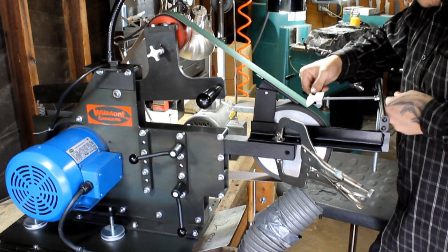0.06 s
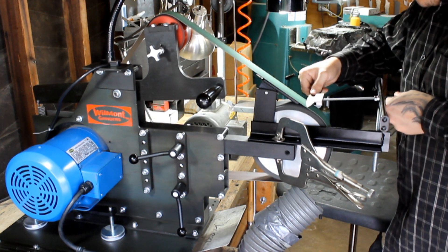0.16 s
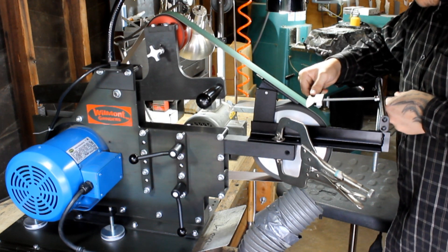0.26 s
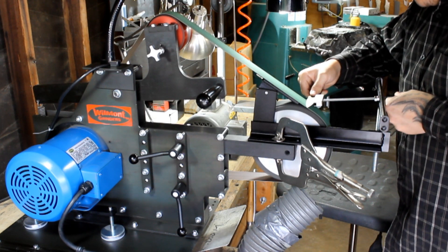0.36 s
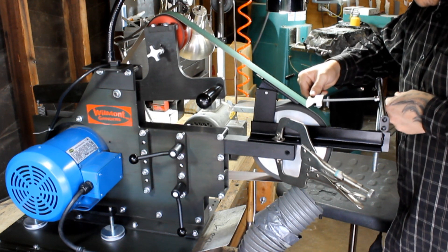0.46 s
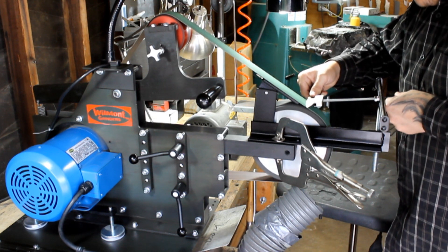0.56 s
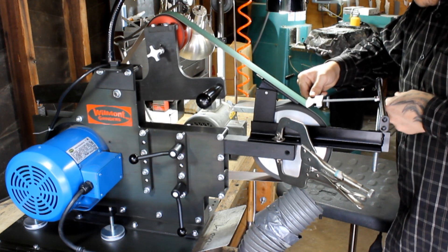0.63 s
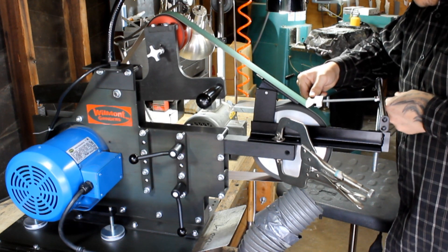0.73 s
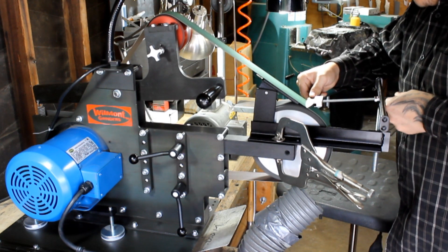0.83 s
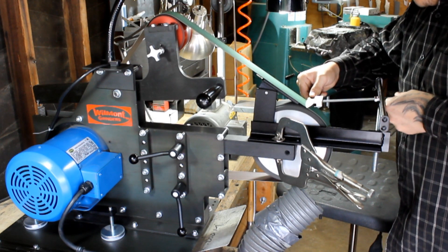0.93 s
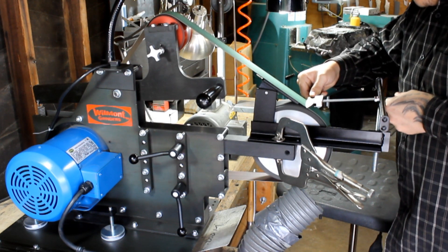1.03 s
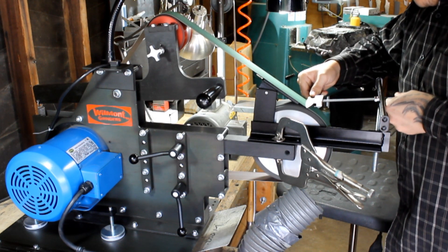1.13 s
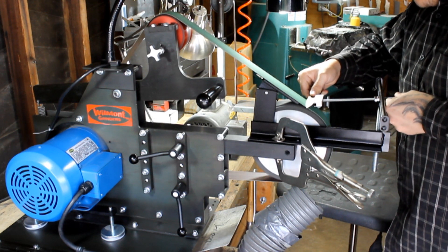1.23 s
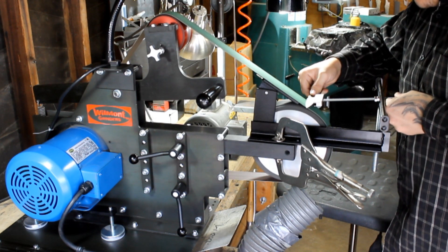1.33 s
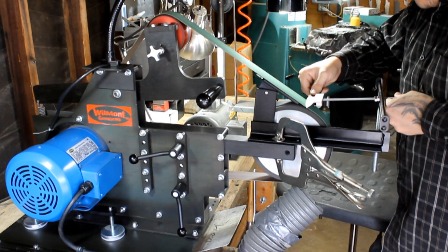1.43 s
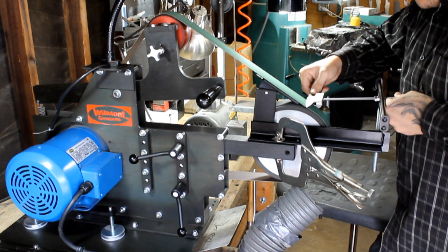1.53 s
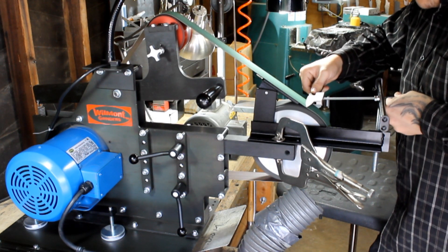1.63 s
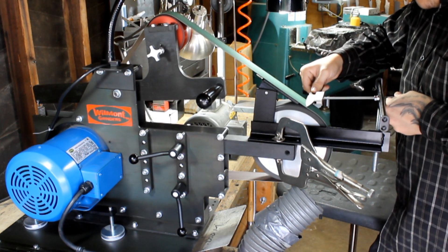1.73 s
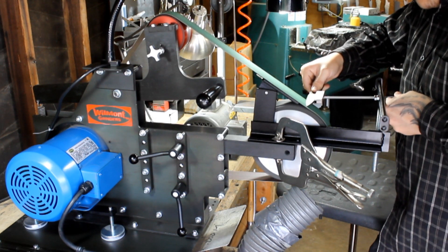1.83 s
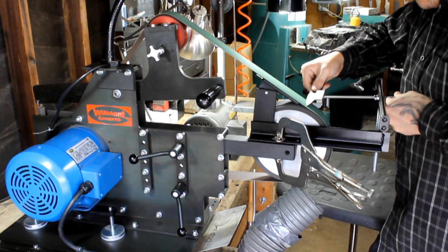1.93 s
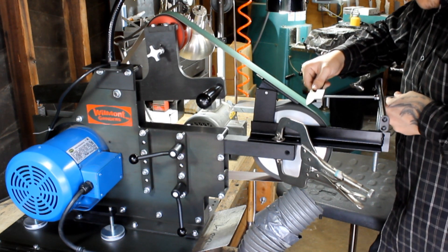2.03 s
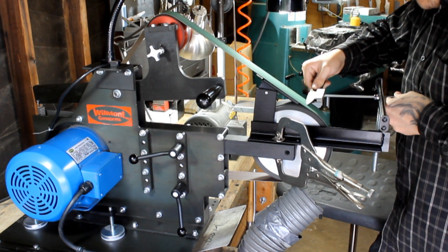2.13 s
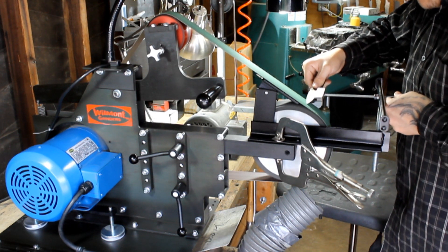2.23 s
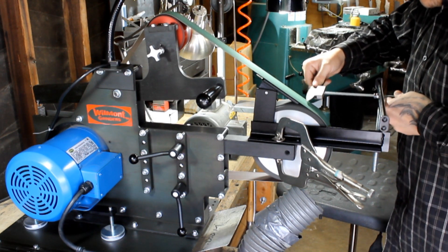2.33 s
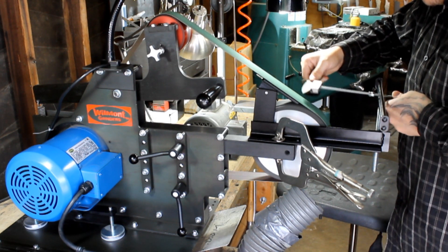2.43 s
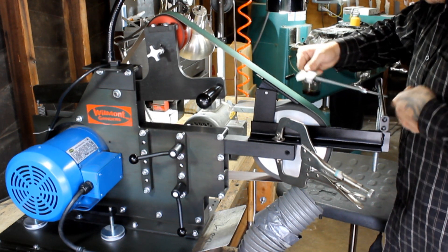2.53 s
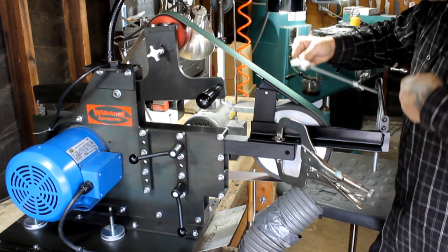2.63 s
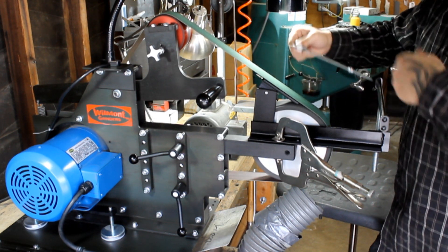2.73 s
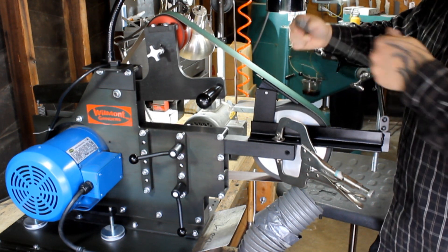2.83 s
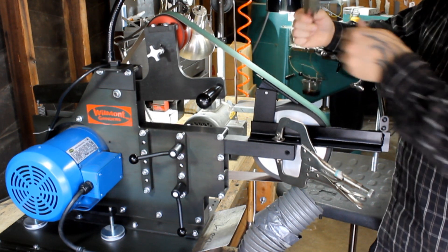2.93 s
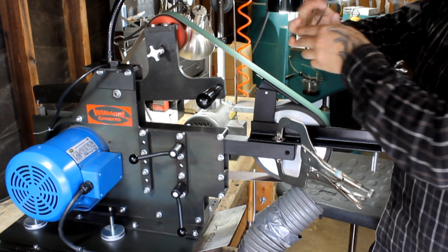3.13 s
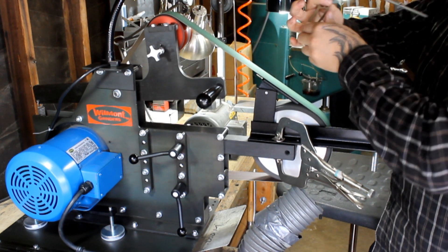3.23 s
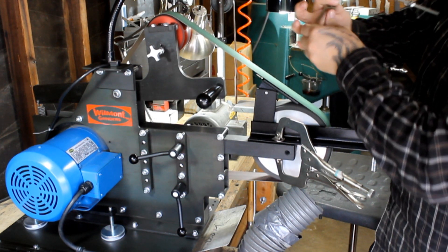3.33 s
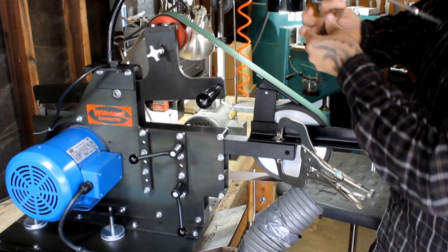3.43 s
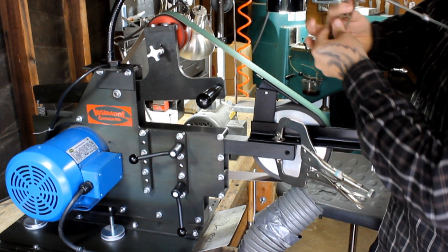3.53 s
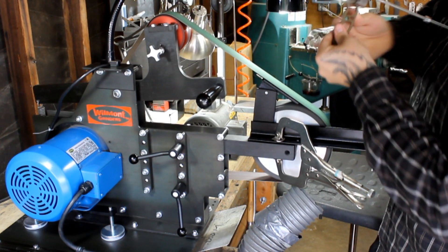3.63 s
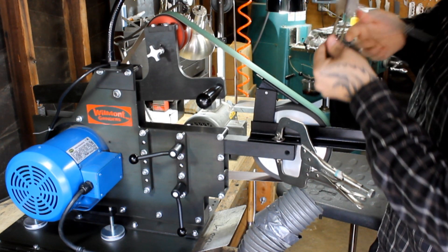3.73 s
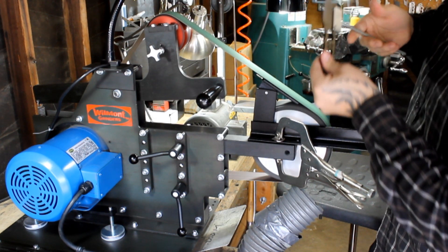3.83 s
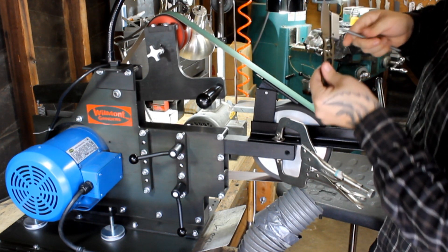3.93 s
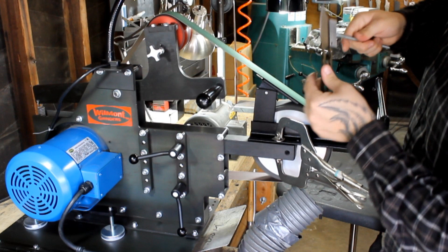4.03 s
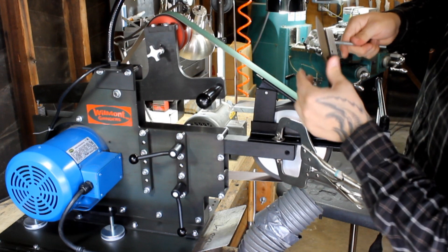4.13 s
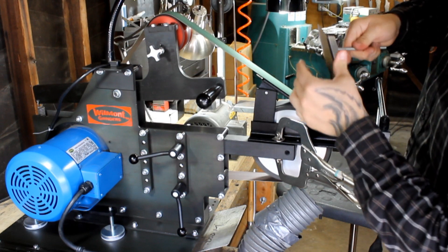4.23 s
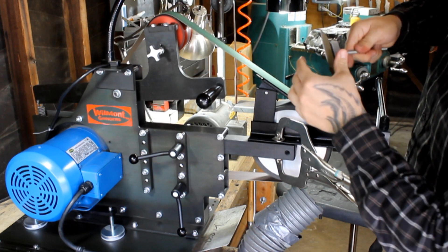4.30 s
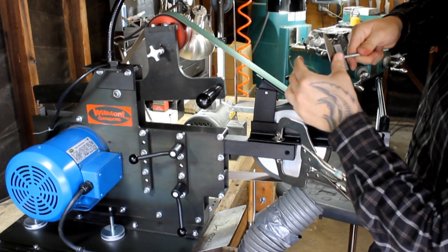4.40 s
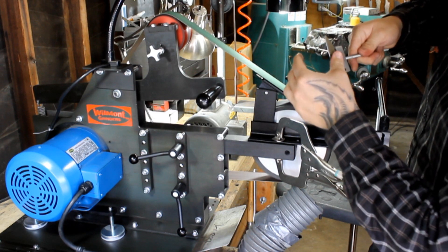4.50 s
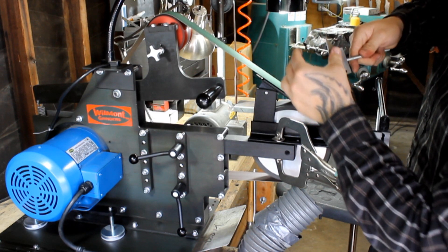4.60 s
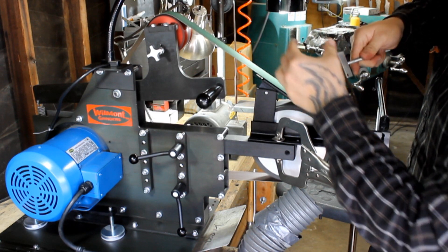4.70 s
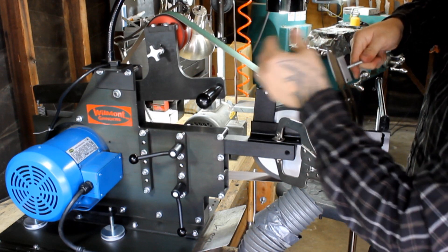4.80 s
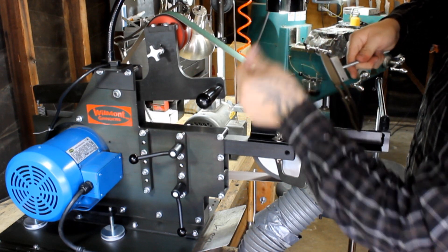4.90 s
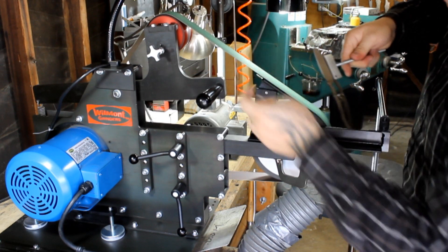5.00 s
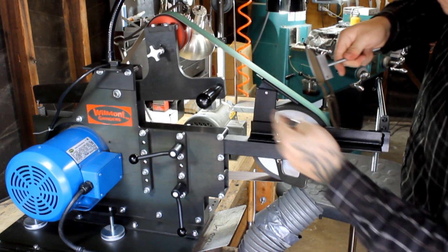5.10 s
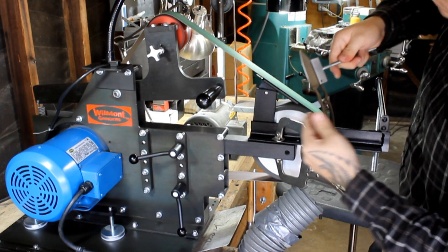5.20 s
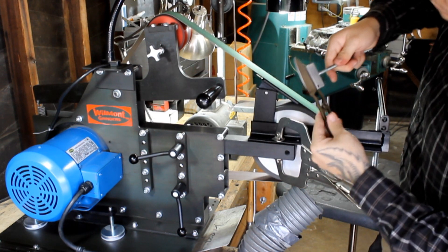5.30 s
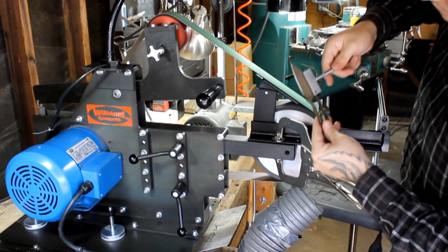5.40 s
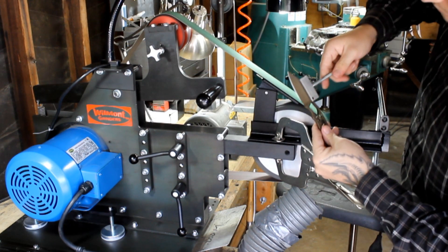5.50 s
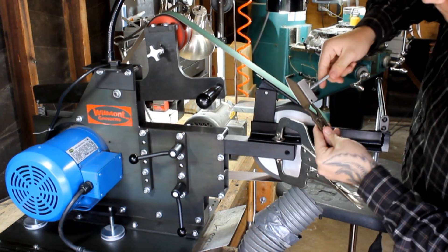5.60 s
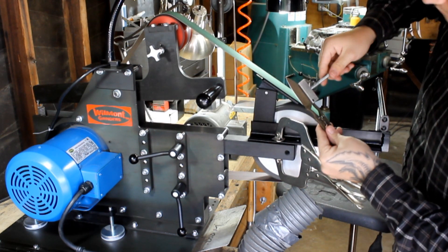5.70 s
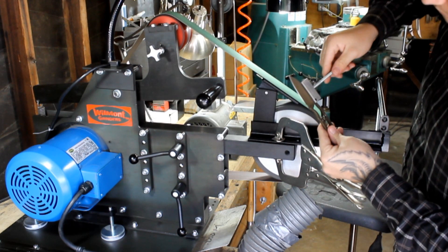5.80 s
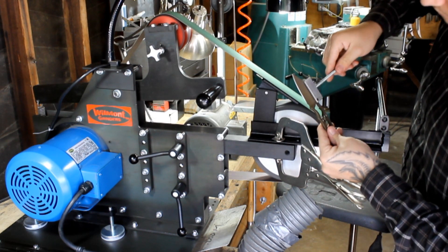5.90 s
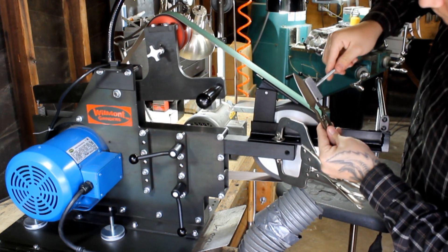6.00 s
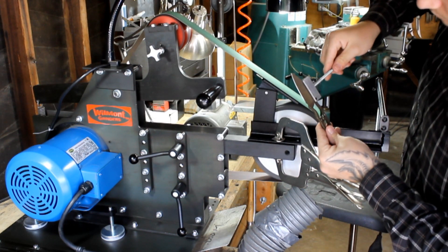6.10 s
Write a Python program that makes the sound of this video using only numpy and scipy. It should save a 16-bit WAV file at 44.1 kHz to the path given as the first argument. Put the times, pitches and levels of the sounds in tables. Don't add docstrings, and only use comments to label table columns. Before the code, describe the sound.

From the start a belt grinder is running in a small workshop with a knife edge already pressed to its belt. The contact makes a loud, dense, rasping hiss, strongest in the high range, with metallic ringing around three to four kilohertz and a quick flutter as belt marks pass about five or six times a second. The machine is pushed back by the camera's automatic gain, most around 1 second. Near 1.9 to 2.2 seconds the scratch changes colour as the tip reaches the belt; at 2.4 it flares briefly and cuts off with a very short room tail. Then the machine sounds fuller: steady fan hum with harmonics, rushing belt and bearing noise, a wavering whistle near one kilohertz and a thin whine near eight. It runs on unchanged past 6 seconds, with one barely noticeable low thud just before 6. Close, essentially mono sound.

```python
import sys
import numpy as np
from scipy import signal
from scipy.fft import rfft, irfft, next_fast_len
from scipy.io import wavfile
from scipy.ndimage import map_coordinates

SR = 44100
rng = np.random.default_rng(int(sys.argv[2]) if len(sys.argv) > 2 else 0)


def decibels_to_gain(level_db):
    exponent = np.asarray(level_db, float) / 20
    return 10 ** exponent


def digitize_waveform(pressure):
    field = np.atleast_2d(pressure).T
    bounded = np.clip(field, -1, 1)
    quanta = np.round(bounded * 32767).astype(np.int16)
    wavfile.write(sys.argv[1], SR, quanta)


N = 271215
T = np.arange(N) / SR

# level in dB, of orders 1, 2, 3, ..
FAN_ORDERS = [1, -1.5, -40, -18, -8, -19, -6, 2, -6, -8, -15]
# level in dB, of orders -3, -2, .. 6.
WHINE_SIDEBANDS = [-17, -8, -8, -5, -7, 0, -17, -22, -9, -17]
# frequency in Hz, level in dB per Hz.
RUSH_SPECTRUM = [(25, -35), (100, -28), (324, -10.5), (555, -6.5), (1090, -5.5), (1850, -7), (2050, -10.5),
                 (2250, -9), (3120, -4), (4700, -8.5), (6630, -10.5), (8000, -9.5), (9410, -16),
                 (15700, -24)]
# frequency in Hz, width in Hz, level in dB over the rush.
FRAME_MODES = [(138.5, 35, 5), (201, 18, 2.5), (703, 24, 7), (1070, 15.5, 10), (1120, 79, 7),
               (2265, 160, 3), (3305, 92, 0.5), (3540, 110, 0), (4090, 43, 0), (4370, 42, 4),
               (5930, 100, -6), (6120, 38, 1)]
# frequency in Hz, width
# in Hz, level in dB over the rush.
WHEEL_MODES = [(280, 8, 8), (307, 6, 10), (841, 8, 4), (971, 8, 3), (1373, 10, 5), (1540, 8, 7),
               (1683, 5, 14), (1814, 10, 5), (3096, 8, 5), (8893, 45, 6)]
# place as share of a lap, level in dB.
BELT_MARKS = [
    (.37, 1.3),
    (.65, 1.3),
    (.88, 1.5),
]
# time in seconds, length in seconds, rise in dB.
WHISTLE_SWELLS = [(.15, 0.5, 4.5), (1.55, 0.035, 11), (2.0, 0.24, 12), (2.5, 0.039, 4), (2.6, 0.06, 7),
                  (2.73, 0.045, 11), (3.07, 0.054, 9), (3.18, 0.06, 7.5), (3.46, 0.078, 7), (3.85, 0.13, 8),
                  (4.35, .2, 9.5), (5.05, 0.31, 11), (5.5, .2, 5), (5.95, 0.19, 5.5)]
# time in seconds, length in seconds, change in dB.
BEARING_LULLS = [
    (.6, .35, -5),
    (1.45, .2, -2),
    (1.75, .06, -6),
    (2.75, .15, -6),
    (3.65, .1, 7.5),
    (4.2, 0.091, -6),
    (4.5, .2, 1),
    (4.95, 0.24, -12),
    (6.1, 0.16, -8),
]
# time in seconds, cut in dB.
PRESSURE = [(0, 6.5), (.45, 8.5), (.65, 10.5), (1.0, 11.5), (1.28, 10), (1.4, 7), (2.15, 6), (2.34, 4.5),
            (2.44, 0.05), (3.3, 0), (6.15, .3)]
# frequency in Hz, width in Hz, level in dB.
BLADE_MODES = [(3015, 34, -6), (3114, 25, -7), (3211, 40, -1), (3340, 80, -8), (3517, 25, -2),
               (3548, 20, -6), (3660, 35, -3), (3798, 30, -5), (3974, 20, 2.5), (4134, 30, -2),
               (4252, 18, -2), (4400, 80, -11), (4650, 45, -9)]
# frequency in Hz, width in Hz, level in dB.
JIG_MODES = [(1903, 42, 3), (2110, 120, -8), (2385, 37, 6), (2450, 40, -5), (2680, 930, 3), (2900, 150, -1)]
# frequency in Hz, width in Hz, level in dB.
UPPER_MODES = [(5370, 140, -9), (5600, 60, -4), (5967, 40, -1), (6100, 25, 1), (6190, 60, -4),
               (6480, 60, -7), (6680, 60, -7), (6950, 100, -8)]
# frequency in Hz, level in dB per Hz.
GRIT_SPECTRUM = [(1500, -36), (2600, -16), (3150, -7), (4100, 1.5), (5000, -2), (6150, -1), (8400, -2),
                 (9000, -2), (13600, -4), (14000, -6.5), (15700, -7)]
# frequency in Hz, width in Hz, level in dB.
GRIT_MODES = [(7350, 87, 3.5), (8320, 430, 1.5), (9100, 80, -1.5), (9790, 56, -10), (10400, 130, -11.5),
              (11100, 56, -4), (12900, 57, 1), (12800, 43, -7)]
# frequency in Hz, change in dB.
TIP_COLOUR = [(4000, 5.5), (4600, 5), (6000, -1), (7700, 4.5), (8800, -1), (12000, 1), (14000, 3),
              (15700, 3)]
# start in seconds, end in seconds.
TIP_SPAN_S = (1.9, 2.16)
# time in seconds, level in dB, frequency in Hz.
KNOCK = (5.985, -56, 45)
SCATTER_S = [.547, 1.035, 1.08, 1.893, 3.61, 3.75, 4.028, 4.121, 4.656, 5.166, 6.12]

BLADE_HZ, CARRIER_HZ, DRIVE_HZ, BELT_HZ = 379.05, 7998.85, 50.87, 5.5
FAN_DB, RUSH_DB, WHISTLE_DB, BEARING_DB = -45.5, -45, -45.5, -45
LIFT_S, FLARE_S, FLARE_DB = 2.398, 0.029, 4
RING_DB, RING_SAG_DB, RING_DIES_DB_PER_S = -30, 2.2, 130
UPPER_DB, UPPER_START_DB, UPPER_RISE_S, UPPER_DIES_DB_PER_S = -34, -6, 0.29, 120
BELLY_ENDS_S, BELLY_LOSS_DB = 1.74, 3.5
JIG_DB, JIG_DAMPED, JIG_TIP_DB, JIG_DIES_DB_PER_S = -36.5, 0.87, 3, 114
GRIT_DB, GRIT_TIP_DB, GRIT_DIES_DB_PER_S, GRIT_TAIL_DB = -33, -4.5, 450, -16


def fan(level_db):
    turn = 2 * np.pi * BLADE_HZ * T + .1 * wobble(3) + .025 * wobble(25)
    tones = 0
    for k, db in enumerate(FAN_ORDERS, 1):
        level = decibels_to_gain(db + (0.74 + 0.024 * k) * wobble(12))
        tones = tones + level * np.sin(k * turn + rng.uniform(0, 2 * np.pi))
    return decibels_to_gain(level_db + 4.0) * tones


def whine(duck_db):
    order = np.arange(-3, 7)
    hz = CARRIER_HZ + 2 * DRIVE_HZ * order
    lag = np.where(order > 3, np.pi, .8 * (order % 2))
    lines = 0
    for f, s, db in zip(hz, lag, WHINE_SIDEBANDS):
        lines = lines + decibels_to_gain(db + 0.33 * wobble(4)) * np.sin(2 * np.pi * f * T - s)
    return decibels_to_gain(duck_db - 43.0) * lines


def rush(level_db):
    source = decibels_to_gain(0.55 * lap(delay=0.18)) * grit(spread_db=-1)
    body = resonant_spectrum(RUSH_SPECTRUM, FRAME_MODES + WHEEL_MODES)
    heard = unit(shop(filtered(source, body), wet_db=-11.0))
    return decibels_to_gain(level_db + 13.0 + 0.21 * wobble(6.6)) * heard


def lap(delay):
    phase = (BELT_HZ * T - delay) % 1
    return sum(db * np.exp(-((phase - at) / .035) ** 2) for at, db in BELT_MARKS)


def whistle(duck_db):
    tone = decibels_to_gain(2.5 * wobble(36)) * np.sin(2 * np.pi * 1100 * T + .7 * wobble(6))
    noise = rung(rng.standard_normal(N), [(1099, 22, 0)])
    frame = decibels_to_gain(WHISTLE_DB + humps(WHISTLE_SWELLS)) * unit(tone + 0.28 * noise)
    bearing = decibels_to_gain(1.5 * wobble(15)) * np.sin(2 * np.pi * 971 * T + .5 * wobble(5))
    return decibels_to_gain(duck_db) * (frame + decibels_to_gain(BEARING_DB + humps(BEARING_LULLS)) * bearing)


def knife(pressure_db):
    ring_db, jig_db, upper_db, hiss_db = stroke(pressure_db)
    press = lap(delay=0) + .5 * wobble(29.6) + 0.23 * wobble(120)
    lift = np.clip((2.6 - T) / 0.1, 0, 1)
    modes = [(hz, width, db + 1.5) for hz, width, db in GRIT_MODES]
    belly = unit(filtered(grit(spread_db=1), resonant_spectrum(GRIT_SPECTRUM, modes)))
    tip = np.interp(T, TIP_SPAN_S, [0, 1])
    scratch = (1 - tip) * belly + tip * filtered(belly, lambda f: decibels_to_gain(along(TIP_COLOUR, f)))
    hiss = decibels_to_gain(hiss_db + 4.5 + 1.2 * press) * scratch
    ring = decibels_to_gain(ring_db - 1 + 0.18 * press) * rung(grit(spread_db=-1.5), BLADE_MODES)
    jig = decibels_to_gain(jig_db + 4.5 + 0.92 * press) * rung(grit(spread_db=3.5), JIG_MODES)
    upper = decibels_to_gain(upper_db + 0.5 + 0.38 * press) * rung(grit(spread_db=1.0), UPPER_MODES)
    return shop(lift * (hiss + ring + jig + upper), wet_db=-9)


def stroke(pressure_db):
    place = np.clip(T / LIFT_S, 0, 1)
    after = np.clip(T - LIFT_S, 0, None)
    tip = np.clip((T - TIP_SPAN_S[1] + 0.26) / 0.39, 0, 1)
    ring = RING_DB - RING_SAG_DB * np.sin(np.pi * place ** 2.0) - RING_DIES_DB_PER_S * after
    ring = ring + humps([(LIFT_S, FLARE_S, FLARE_DB)])
    jig = JIG_DB - JIG_DAMPED * np.maximum(pressure_db, 4) + JIG_TIP_DB * tip - JIG_DIES_DB_PER_S * after
    upper = UPPER_DB + UPPER_START_DB * np.exp(-T / UPPER_RISE_S) - UPPER_DIES_DB_PER_S * after
    upper = upper - BELLY_LOSS_DB * np.clip((T - BELLY_ENDS_S) / .06, 0, 1)
    hiss = GRIT_DB + GRIT_TIP_DB * tip + np.maximum(-GRIT_DIES_DB_PER_S * after, GRIT_TAIL_DB)
    return ring, jig, upper, hiss


def grit(spread_db):
    return unit(rng.standard_normal(N) * decibels_to_gain(spread_db * wobble(900)))


def knock():
    s, db, hz = KNOCK
    return decibels_to_gain(db) * np.exp(-((T - s) / 0.011) ** 2) * np.cos(2 * np.pi * hz * (T - s))


def shop(x, wet_db):
    t = np.arange(SR // 2) / SR
    tail = rng.standard_normal(len(t)) * decibels_to_gain(-60 * t / 0.28) * (t > .004)
    answer = signal.fftconvolve(x, tail / np.linalg.norm(tail))[:N]
    return (x + decibels_to_gain(wet_db) * answer) / np.sqrt(1 + decibels_to_gain(2 * wet_db))


def mode(f, hz, width):
    return 1j * f * abs(width) / (hz * hz - f * f + 1j * f * abs(width))


def mode_power(f, modes):
    return sum(np.abs(decibels_to_gain(db) * mode(f, hz, width)) ** 2 for hz, width, db in modes)


def resonant_spectrum(points, modes):
    return lambda f: decibels_to_gain(along(points, f)) * np.sqrt(1 + mode_power(f, modes))


def rung(x, modes):
    return unit(filtered(x, lambda f: np.sqrt(mode_power(f, modes))))


def filtered(x, response):
    m = next_fast_len(N + SR // 2)
    return irfft(rfft(x, m) * response(np.fft.rfftfreq(m, 1 / SR)), m)[..., :N]


def unit(x):
    return x / np.sqrt(np.mean(x ** 2) + 1e-20)


def along(points, hz):
    f, v = np.transpose(points)
    return np.interp(np.log(hz + 1), np.log(f + 1), v)


def wobble(rate):
    knots = rng.standard_normal(N // 100)
    return np.interp(T, T[::8], map_coordinates(knots, [T[::8] * rate]))


def humps(rows):
    return sum(db * np.exp(-((T - s) / length) ** 2) for s, length, db in rows)


def scene():
    pressure_db = np.interp(T, *np.transpose(PRESSURE))
    machine = fan(FAN_DB - 0.87 * pressure_db) + whine(2.0 - 1.3 * pressure_db)
    machine = machine + rush(RUSH_DB - 1.046 * pressure_db) + whistle(-0.9 * pressure_db)
    mono = machine + knife(pressure_db) + knock()
    return np.array([mono, mono])


def scattered(x):
    hz, t, z = signal.stft(x, SR, nperseg=1024)
    shape = (len(SCATTER_S), 3)
    lows = rng.uniform(4200, 13500, shape)[..., None]
    chosen = (rng.uniform(size=shape) < .45)[..., None]
    bands = ((hz > lows) & (hz < 1.14 * lows) & chosen).any(axis=1)
    patch = bands.T @ (np.abs(t - np.c_[SCATTER_S]) < .012)
    scramble = np.exp(2j * np.pi * rng.uniform(size=z.shape))
    return signal.istft(np.where(patch, 1.74 * z * scramble, z), SR, nperseg=1024)[1][:, :N]


def low_pass(x):
    return signal.sosfilt(signal.butter(12, 17050, fs=SR, output="sos"), x)


def record(dry):
    limited = filtered(dry, lambda f: f < 15740)
    return low_pass(scattered(limited))


dry = scene()
out = record(dry)
digitize_waveform(out)
```